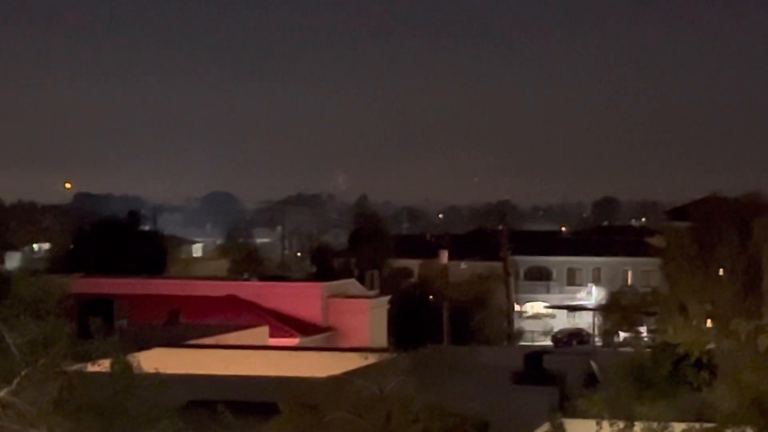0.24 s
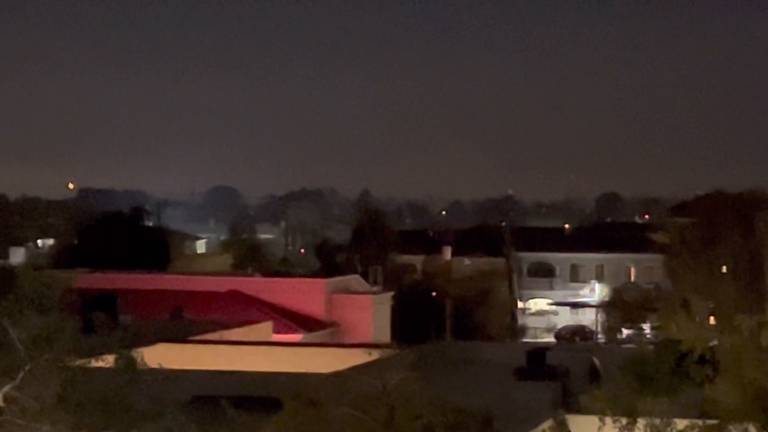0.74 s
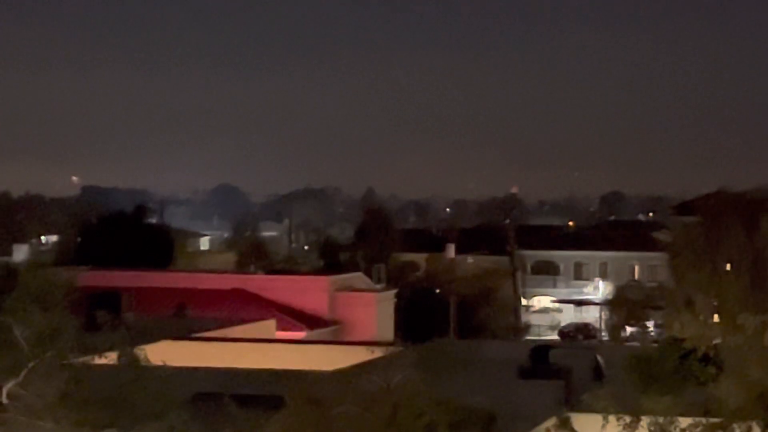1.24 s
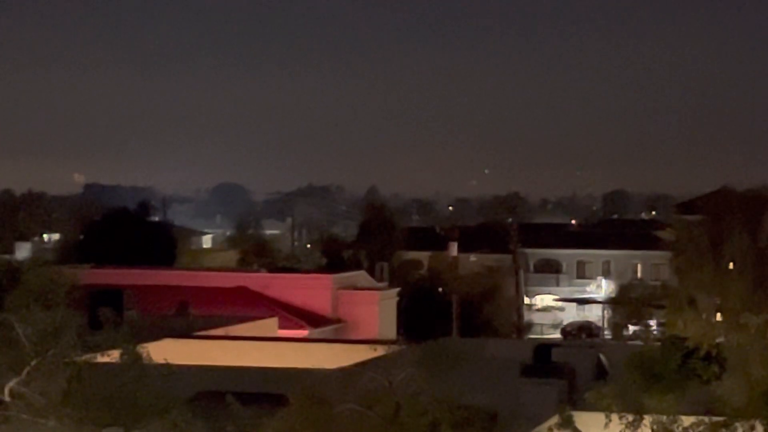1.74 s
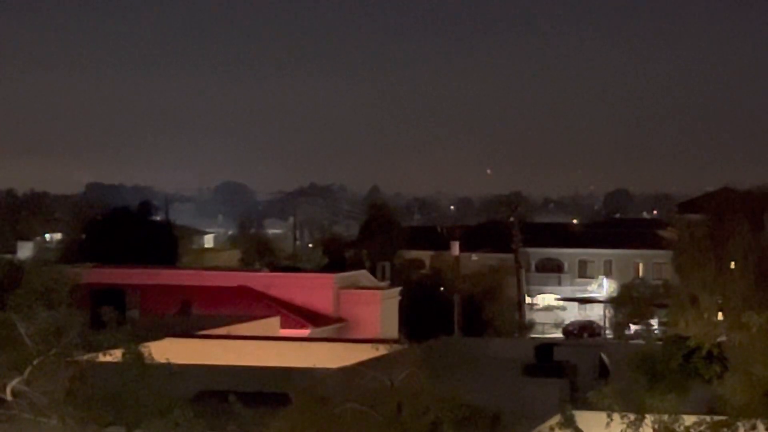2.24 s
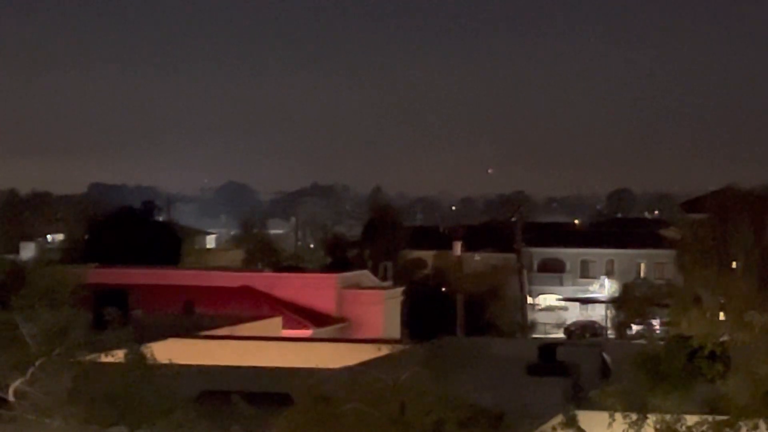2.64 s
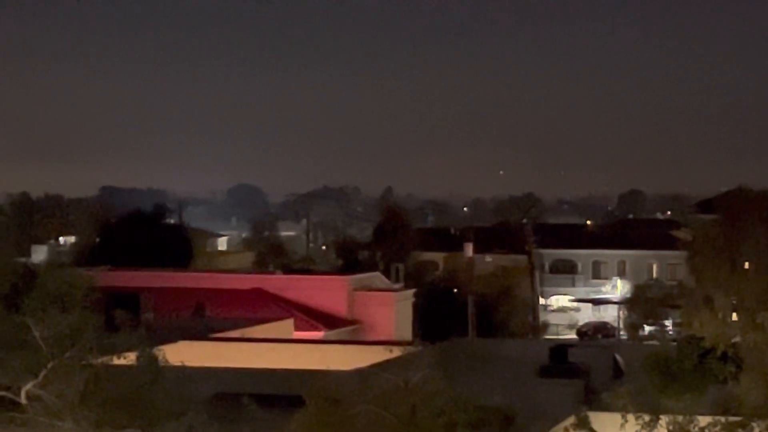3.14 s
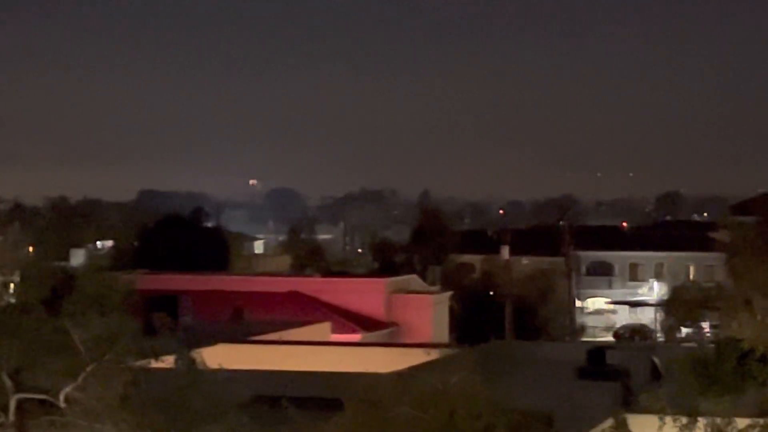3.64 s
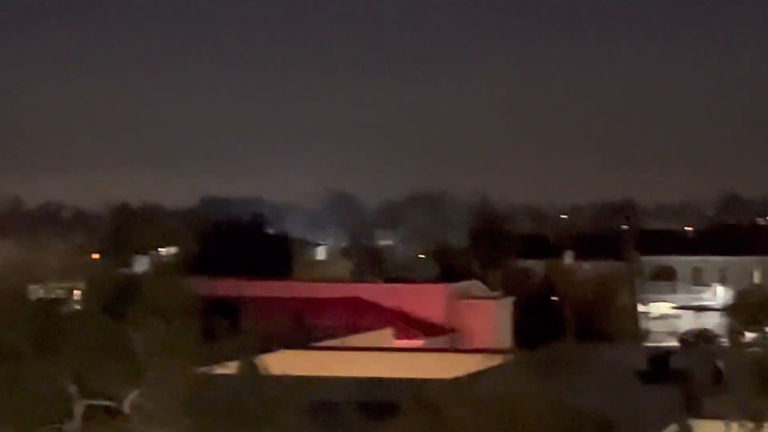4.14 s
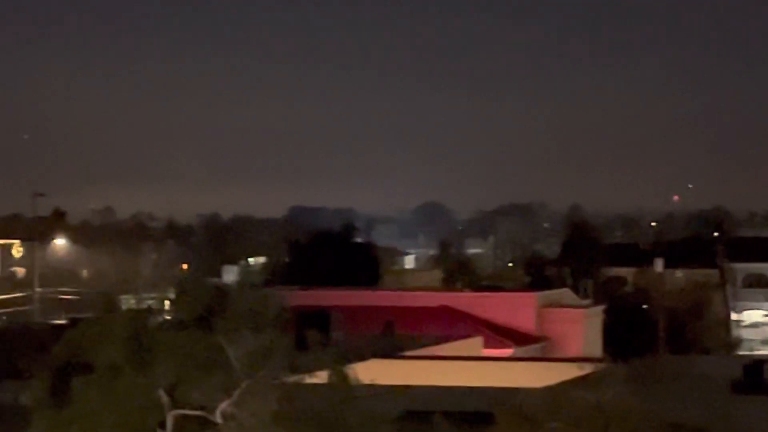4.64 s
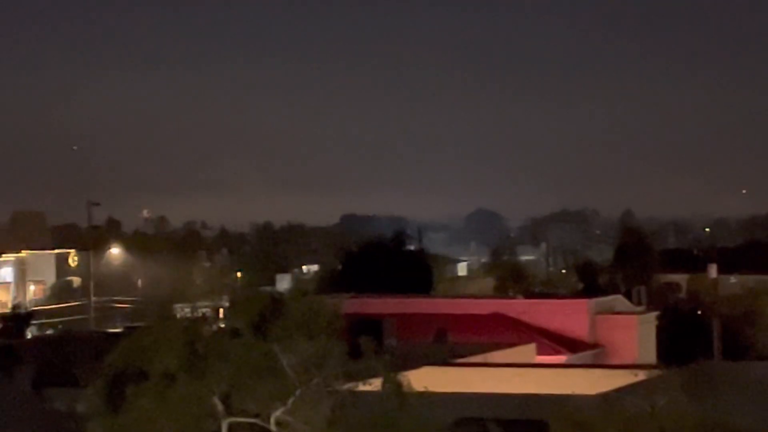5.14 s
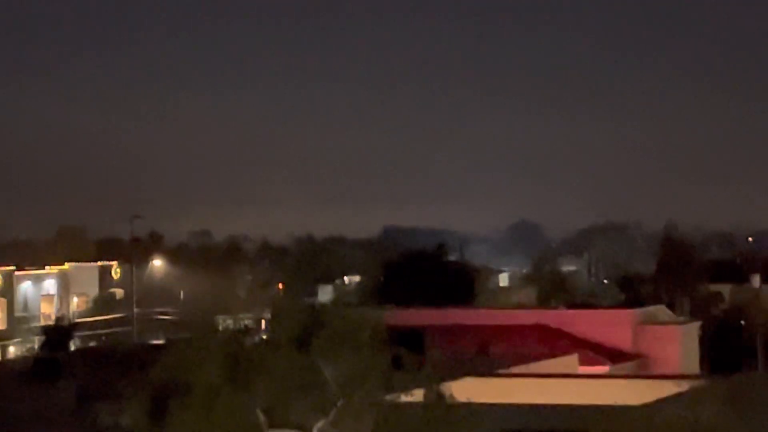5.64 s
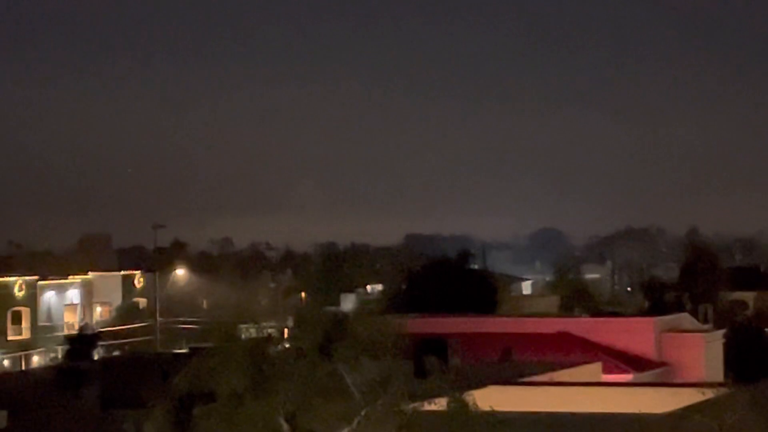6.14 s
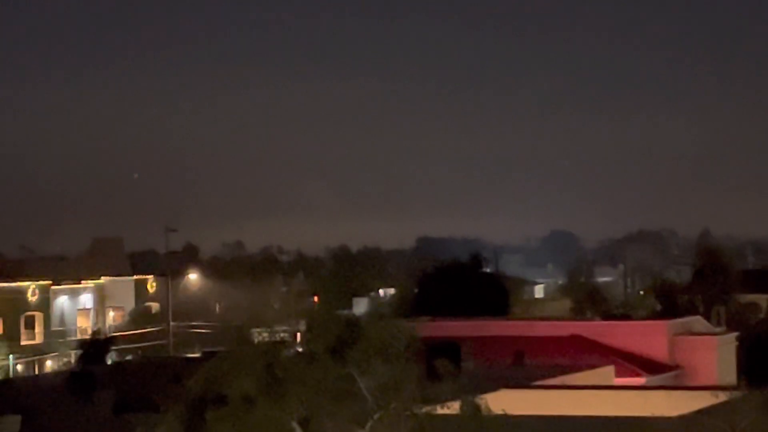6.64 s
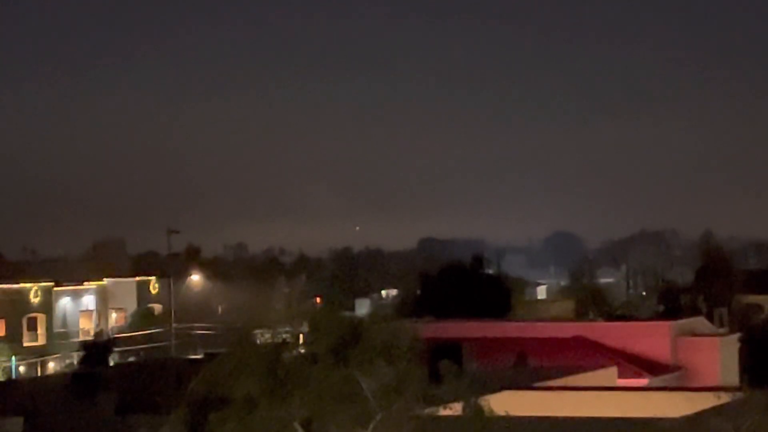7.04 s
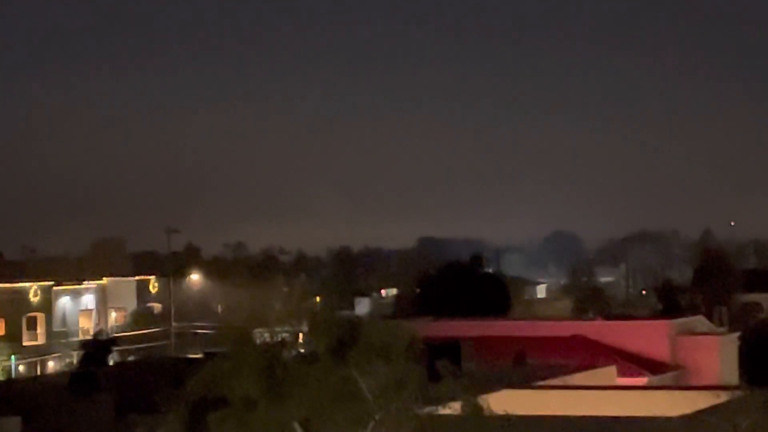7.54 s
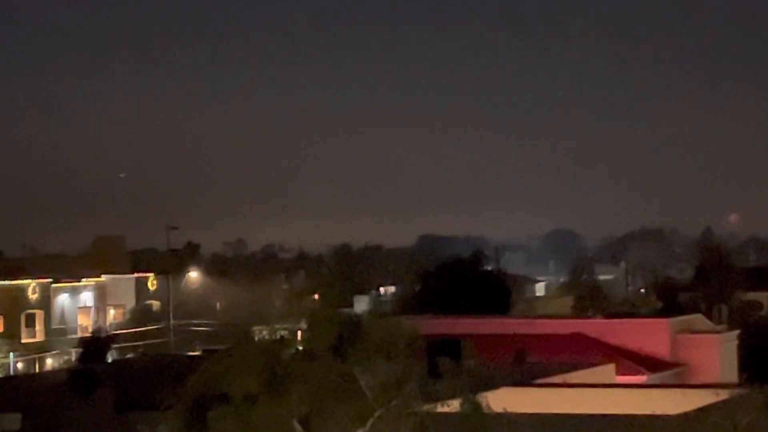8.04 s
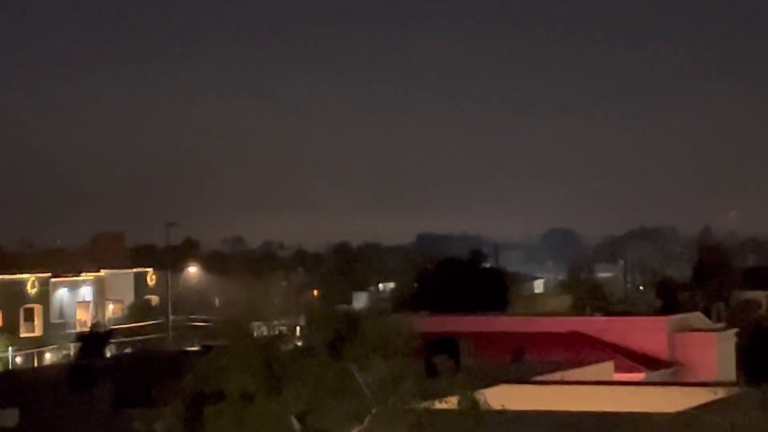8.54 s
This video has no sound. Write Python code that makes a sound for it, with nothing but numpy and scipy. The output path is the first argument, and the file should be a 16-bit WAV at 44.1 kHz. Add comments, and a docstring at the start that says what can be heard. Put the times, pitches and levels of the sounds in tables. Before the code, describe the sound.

Distant fireworks at night across a suburb, heard from a balcony on a phone with narrow, bass-softened stereo. From the start, faint hiss sits under a wavering low rumble of countless merged bursts and a hazy wash of brighter echoes. At 0.3-0.45 s dull knocks and booms appear; a firmer boom lands near 1.0 s, followed by rapid smaller pops until about 2 s. Between 2 and 4 s come spaced, deep muffled thuds, with sharper pops near 3.6 s. A tiny dry tick falls close by at 4.4 s, then hollow booms at 4.6 and 4.9 s. A crowded volley rattles at 6.1-6.3 s. At 7.1 s the loudest burst bangs hard, ringing hollow and slapping off walls. Weaker pops follow around 7.6-8.1 s; a last tight group knocks and cracks at 8.6-8.7 s as the rumble continues until the end.

```python
"""Night fireworks far off over a suburb, heard by a phone on a balcony about 9 s long.
From the start, town hiss lies under a rumble of countless merged far bursts and a bright haze of echoes.
From 0.3 s single bursts knock and boom: pulses dulled by air, thrown back by near walls and houses,
some with a hollow ring. A dry tick falls near the phone at 4.4 s, a volley crowds 6.1 s, the loudest
burst comes at 7.1 s, a last group at 8.6 s. The phone delays the bass and narrows much of the stereo."""
import sys
import numpy as np
from scipy import signal
from scipy.fft import rfft, irfft, next_fast_len
from scipy.io import wavfile
from scipy.ndimage import uniform_filter1d

SR = 44100
rng = np.random.default_rng(int(sys.argv[2]) if len(sys.argv) > 2 else 0)


def store_pcm(level_fs):
    """Save levels as 16-bit WAV."""
    pcm = np.round(np.clip(level_fs, -1, 1) * 32767).astype(np.int16)
    wavfile.write(sys.argv[1], SR, np.atleast_2d(pcm).T)


N = 387638
SPAN = 2 ** 14  # samples given to one burst with its echoes
SIDES = np.array([[1], [-1]])  # left, right


def undb(db):
    """Turn dB into an amplitude factor."""
    return 10 ** (np.asarray(db) / 20)


def level(x, db):
    """Scale to an RMS level in dB, taken over both channels together."""
    return x * undb(db) / np.sqrt(np.mean(x ** 2))


def on_log(hz, points_hz, values):
    """Straight lines on a log-frequency axis."""
    return np.interp(np.log(hz + 1), np.log(points_hz), values)


def colour(x, points):
    """Filter by a (f/Hz, gain/dB) outline without shifting phase."""
    size = next_fast_len(N)
    hz = np.fft.rfftfreq(size, 1 / SR)
    gain = undb(on_log(hz, *np.transpose(points)))
    return irfft(rfft(x, size) * gain, size)[..., :N]


def walk(rate):
    """Random levels, rate per second, slewed twice into a smooth wander with a spread near a third."""
    k = int(SR / rate)
    steps = np.repeat(rng.standard_normal(N // k + 1), k)
    return 0.46 * uniform_filter1d(uniform_filter1d(steps, k), k)[:N]


def hiss():
    """Town hiss and microphone noise: coloured noise whose level wavers slightly."""
    # outline of the hiss: f/Hz, relative level/dB
    hiss_outline = [(300, -34), (1000, -12.5), (2000, -0.5), (2700, -2), (3300, -8), (4500, -12.5),
                    (5600, -15.5), (7000, -23.5), (8500, -25), (10300, -30), (11500, -36)]
    noise = colour(rng.standard_normal((2, N)), hiss_outline)
    return level(noise, -65) * undb(0.47 * walk(5.3) + 0.38 * walk(1.4))


def rustle():
    """Narrow bands of noise in the haze: slow noise turned up to a drifting centre, its level swelling."""
    # drifting bright bands: centre f/Hz, width f/Hz, level/dB re haze before swelling, drift scale f/Hz
    drifting_bands = [(1720, 300, -4.5, 90), (2155, 360, -12, 120)]
    out = 0
    for hz, width, db, drift in drifting_bands:
        low_pass = signal.butter(2, width / 2, fs=SR, output="sos")
        slow = signal.sosfilt(low_pass, rng.standard_normal((2, 2, N)))
        turn = 2 * np.pi * np.cumsum(hz + drift * walk(1.5) * 2) / SR
        band = slow[0] * np.cos(turn) + slow[1] * np.sin(turn)
        out = out + level(band, db) * undb(4 * walk(6))
    return out


def rumble():
    """Faint bursts at random moments, smeared by their echoes, melt with noise into a wavering roar."""
    # roar of the merged far bursts, before the balcony: t/s, low level/dB, upper level/dB
    roar_levels = [(0.0, -39.5, -51), (0.46, -35.5, -55.5), (0.9, -39, -54), (1.1, -36.5, -54),
                   (1.35, -37, -49.5), (2.47, -37, -54), (3.871, -34, -51.5), (4.31, -38.5, -53),
                   (4.77, -36.5, -45.5), (5.02, -37.5, -51), (5.97, -37.5, -53), (6.31, -33, -50),
                   (6.76, -36, -51.5), (7.07, -32.5, -52.5), (7.27, -30.5, -45.5), (7.929, -37, -50.5),
                   (8.54, -33.5, -52.5), (8.79, -36, -39.5)]
    # outline of the roar before its parts are levelled: f/Hz, gain/dB
    roar_outline = [(15, -34), (25, -8), (69, -1.5), (155, 0), (245, -2), (294, -10), (345, -10.5),
                    (421, -12.5), (629, -20), (695, -20), (939, -27.5), (1970, -37), (3000, -62),
                    (3900, -76), (6600, -120)]
    # lingering bright echoes over the roofs, before the balcony: t/s, level/dB
    haze_levels = [(0.0, -63.5), (1.03, -62), (1.15, -58.5), (1.36, -57), (1.62, -59.5), (2.25, -63.5),
                   (3.11, -61), (3.67, -55.5), (4.04, -59.5), (4.55, -58), (5.09, -62.5), (6.02, -62),
                   (6.19, -59), (6.9, -63.5), (7.12, -59), (7.27, -56), (7.74, -60), (8.45, -61.5),
                   (8.67, -61.5), (8.79, -60.5)]
    far_per_s, directions = 90, 4  # far bursts per second from all directions together
    t = np.arange(N) / SR
    far = np.zeros((2, N))
    for _ in range(directions):
        moments = rng.random(N) < far_per_s / directions / SR
        hits = moments * undb(2.24 * rng.standard_normal(N))
        tail = rng.standard_normal((2, SPAN // 2)) * undb(-60 * t[:SPAN // 2] / 0.28)
        far += signal.fftconvolve(hits[None], tail, axes=1)[:, :N]
    steady = rng.standard_normal((2, N))
    roar = colour(level(far, -2.4) + level(steady, -3.0), roar_outline)
    low = signal.sosfiltfilt(signal.butter(2, 450, fs=SR, output="sos"), roar)
    top = signal.sosfiltfilt(signal.butter(2, 1200, "high", fs=SR, output="sos"), roar)
    upper = roar - low - top
    haze = (level(top, 0) + rustle()) * undb(np.interp(t, *np.transpose(haze_levels)))
    s, low_db, upper_db = np.transpose(roar_levels)
    low = level(low, 0) * undb(np.interp(t, s, low_db))
    upper = level(upper, 0) * undb(np.interp(t, s, upper_db))
    return low + upper + haze


def tick():
    """One dry tick close to the phone: bright noise dying in about half a millisecond, with a faint tail."""
    start_s, noise_db, tail_db = 4.3579, -46, -24  # noise level before its colour; tail re tick
    t = np.arange(N) / SR - start_s
    after = np.clip(t, 0, 1)
    shape = (t >= 0) * (np.exp(-after / .0005) + undb(tail_db) * np.exp(-after / .02))
    outline = [(1000, -30), (2500, 2), (6000, -2), (11000, -3)]  # f/Hz, gain/dB
    return undb(noise_db) * colour(rng.standard_normal(N) * shape, outline)


def rings():
    """Short damped tones with a soft start, a little uneven left and right."""
    # hollow rings of some bursts, as from a yard or street: t/s, nominal level/dB, f/Hz, decay t60/s
    hollow_rings = [(0.342, -27, 340, 0.053), (0.346, -26.5, 151, .12), (0.436, -24, 261, .08),
                    (0.976, -20, 381, 0.11), (0.98, -35, 840, .05), (1.133, -40.5, 1240, 0.079),
                    (1.135, -38, 694, 0.055), (1.297, -26.5, 314, .08), (1.311, -39.5, 1300, .07),
                    (1.541, -29, 904, .047), (1.551, -39.5, 1840, .07), (1.976, -42, 1035, .056),
                    (1.979, -26.5, 340, .07), (2.462, -38.5, 853, .045), (2.465, -21.5, 153, .12),
                    (2.986, -23.5, 140, 0.13), (3.322, -26, 402, 0.11), (3.616, -31.5, 967, .045),
                    (3.622, -36, 1570, .04), (3.735, -29.5, 276, 0.078), (3.747, -40, 1730, .08),
                    (4.555, -30, 319, 0.065), (4.555, -33, 867, 0.062), (4.579, -41, 1600, .05),
                    (4.637, -26.5, 267, .08), (4.931, -21.5, 215, .09), (5.367, -36, 900, .054),
                    (6.098, -19, 311, 0.079), (6.1, -35.5, 770, .05), (6.115, -20, 311, .09),
                    (6.129, -21, 312.4, .09), (6.153, -33.5, 702, .05), (6.236, -33, 324, .05),
                    (7.113, -13, 920, .048), (7.115, -11, 600, .06), (7.116, -6, 201, .1),
                    (7.122, -25.5, 1655, 0.046), (7.122, -28, 2244, 0.032), (7.134, -32, 1665, 0.061),
                    (7.632, -41, 1530, .05), (8.623, -26.5, 279, 0.077), (8.703, -25, 976, 0.056),
                    (8.704, -19, 433, 0.087), (8.713, -21.5, 404, .074), (8.713, -37, 920, .05)]
    share_db, rise_s = -4.5, 0.0027  # added to every nominal level; time constant of the start
    t = np.arange(SPAN // 2) / SR
    out = np.zeros((2, N + SPAN))
    for s, nominal_db, hz, t60 in hollow_rings:
        phase, pan_db = rng.standard_normal(2)
        tone = np.sin(2 * np.pi * hz * t + phase)
        shape = (1 - np.exp(-t / rise_s)) * undb(-60 * t / t60)
        i = int(s * SR)
        out[:, i:i + len(t)] += undb(nominal_db + share_db + pan_db * SIDES) * shape * tone
    return out[:, :N]


def walls(hz):
    """Spectrum of the near slaps on each side: later ones duller, rough fronts scatter the treble."""
    # slaps from the balcony and the next walls, before random spread: delay t/ms, level/dB, left-right/dB
    wall_slaps = [(3.94, -13, -5), (9.34, -3, -2), (13.74, -5, -1.5), (18.15, -9, -3), (24.88, -14, 0.5),
                  (29.69, -9, 3), (39.6, -19, -4), (56.42, -10.5, -2)]
    dull_hz_ms = 60000  # a slap after 10 ms dulls from a tenth of this in Hz
    slaps = 0
    for ms, db, pan_db in wall_slaps:
        level_chance, delay_chance, side_chance = rng.standard_normal(3)
        gain = undb(db + 1.5 * level_chance + pan_db / 2 * SIDES)
        delay_ms = ms + 0.6 * delay_chance + 0.02 * side_chance * SIDES
        dulling = 1 / np.sqrt(1 + (hz * ms / dull_hz_ms) ** 4)
        slaps = slaps + gain * dulling * np.exp(-2j * np.pi * hz * delay_ms / 1000)
    t = np.arange(SPAN // 4) / SR
    decay = undb(-10 - 60 * t / 0.078)  # t60 0.078 s
    scatter = rng.standard_normal((2, SPAN // 4)) * decay * (1 - np.exp(-(t / 0.0064) ** 4))
    lumps = np.repeat(undb(3.9 * rng.standard_normal((2, SPAN // 512))), 128, axis=1)
    treble_only = 1 / np.sqrt(1 + (1180.0 / (hz + 1)) ** 6)
    return slaps + rfft(scatter * lumps, SPAN)[:, :len(hz)] * treble_only


def houses(hz, shares):
    """Spectrum of the echoes from rows of houses on each side: patchy noise, each band with its own decay."""
    # echoes in the five bands from thump to crack: decay t60/s, relative level/dB
    house_echoes = [(0.29, 12), (0.36, 8.5), (0.12, -7.5), (0.97, -8), (0.23, -4)]
    t = np.arange(SPAN) / SR
    patches = np.repeat(undb(2.8 * rng.standard_normal((2, SPAN // 256))), 256, axis=1)
    scatter = rng.standard_normal((2, SPAN)) * patches * (1 - np.exp(-t / 0.0013)) * 0.04
    out = 0
    for share, (t60, db) in zip(shares, house_echoes):
        out = out + share * rfft(scatter * undb(db - 60 * t / t60))[:, :len(hz)]
    return out


def bursts():
    """Each burst is a pulse shaped in five bands and dulled by the air, with wall slaps and house echoes."""
    # single bursts, before air and balcony: t/s, knock level/dB, boom/dB re knock, snap/dB re knock,
    # crack/dB re knock, echoes/dB re the usual share, distance/km
    single_bursts = [(0.343, -30, 9, -29, -31, -3.5, 1.5), (0.439, -30, 6.5, -14.5, -23, 1.5, 2),
                     (0.45, -33, 3.5, -10.5, -32, 3, 3.5), (0.909, -42.5, 16.5, -6, -25, 2, 2),
                     (0.977, -26.5, 6.5, -13, -25, 1, 0.99), (1.112, -38.5, -7, 1, -8, -2, 1.5),
                     (1.133, -36.5, 2.5, 3.5, -6, -2, 1.5), (1.18, -38, 11.5, -6.5, -16, -1, 2),
                     (1.252, -42, 5, 7, -11, 8, 2.5), (1.268, -39, 1, 4, -3.5, -0.5, 2),
                     (1.297, -32, 6, -6, -27, 2, 3), (1.313, -37, 7, 5, 0, -4, 2),
                     (1.367, -45, 5.5, 3.5, -9, 5.5, 2), (1.543, -30.5, -3, 5, -2, -2, 0.24),
                     (1.592, -42.5, 19, -5.5, -17, -3.5, 3.5), (1.63, -40.5, -2, 2, -22, -1.5, 2.9),
                     (1.676, -45.5, -7.5, 10.5, -19, 0.5, 3), (1.83, -37.5, 16, -9, -19, -0.5, 3),
                     (1.867, -38, 16.5, -4.5, -24, -7, 3), (1.978, -28.5, 3, -6, -9, -2, 2.8),
                     (2.259, -43.5, 21, -9.5, -25, -2, 3.1), (2.462, -36.5, 16.5, -1, -10, 2, 2),
                     (2.55, -48, 25, -15.5, -9, -0.5, 1), (2.652, -41, 14, -13, -26, 1, 3),
                     (2.714, -36.5, 15, -11.5, -22, -1.5, 3.3), (2.983, -43.5, 27.5, -16, -28, -7.5, 3.5),
                     (3.314, -30.5, -13, -32.5, -32, 10, 1), (3.617, -32, 18.5, -8, -9, -1, 2),
                     (3.737, -32.5, 1.5, 1, -6, -2, 0.8), (4.05, -38.5, 18.5, -9, -19, 0, 0.82),
                     (4.127, -43, 24, -15, -13, -5.5, 1), (4.202, -35, 13.5, -3.5, -12, -1.5, 1.6),
                     (4.288, -39, 9, -26, -19, 2.5, 1), (4.555, -32, -1.5, -6, -9.5, 7, 1.1),
                     (4.636, -32.5, 6, -6.5, -33, 6, 2), (4.685, -38, 13, -19, -20, 7, 2),
                     (4.731, -32, 6, -10, -23.5, 2, 3.7), (4.929, -27.5, 9.5, -10.5, -20, -0.5, 1.7),
                     (5.275, -47.5, 16, -21.5, -28, 8, 1.2), (5.349, -38, 15, -30, -29, 5, 1),
                     (5.368, -40.5, 19.5, 5.5, -6, 4.5, 2.1), (5.467, -44, 17, -3, -3, 5, 2.6),
                     (5.58, -33, -2, -13, -12, 2, 1.6), (5.953, -38, 17, -23, -24.5, -2.5, 1.4),
                     (6.091, -32, -3, -12, -11, -5, 2), (6.1, -24.5, 1.5, -10.5, -8, -1.5, 1.6),
                     (6.11, -29.5, 2.5, -3.5, -14.5, -0.5, 2.5),
                     (6.121, -28.5, -7.5, -16.5, -15.5, -1, 1.8), (6.133, -32, 7, -19, -23.5, -2, 2),
                     (6.144, -34, 12, -19, -18, -15, 2), (6.155, -30, 9.5, 2.5, -12, -2, 1.8),
                     (6.201, -36.5, -2, -3, -24, 3, 3), (6.24, -34, 0.5, -3.5, -26, 8, 3.9),
                     (6.28, -36.5, 3, -7.5, -20.5, 9, 3), (6.32, -37.5, -4, -7.5, -27, 6, 2.3),
                     (6.502, -40.5, 14, -7, -21, 7, 2.7), (6.689, -40.5, 16.5, -10.5, -11, -8.5, 2.5),
                     (6.767, -40, 8.5, 4.5, -8, 5, 3.5), (7.1142, -9.5, 0.5, -1.5, -3.5, -2.5, 0.92),
                     (7.168, -30.5, 3, -9.5, -22.5, -5.5, 3), (7.249, -27.5, -1, -22.5, -32.5, 3.5, 2.1),
                     (7.39, -31.5, 4, -14, -23, -10, 1.8), (7.633, -29.5, -9.5, 2.5, -5, -1, 0.3),
                     (7.715, -38.5, 0, 0.5, -17, 4, 1.5), (7.776, -43, 16.5, -17, -30, -1.5, 3.9),
                     (7.805, -43.5, 17.5, -8, -26, 1.5, 3), (7.896, -41.5, 10, 3, 3.5, -1, 1),
                     (8.123, -33, 3, -14, -12, 2.5, 2.5), (8.623, -28, -5.5, -3.5, -8.5, -2, 0.8),
                     (8.646, -40, 6, -4, 8, -8.5, 1.2), (8.682, -27, -17.5, -10.5, -12, 0, 2.5),
                     (8.704, -21.5, -30, -3, -9.5, 1, 1.3)]
    # thump, body (the boom), knock, snap, crack: low edge f/Hz, high edge f/Hz
    band_edges = [(40, 120), (120, 280), (280, 500), (500, 1000), (1000, 2400)]
    thump_db, thump_per_boom = -11, 0.77  # the deepest band follows the boom
    slap_db, house_db = -5.5, -8  # usual shares of wall slaps and house echoes
    air_hz, air_slope = 1880, .22  # the air dulls from here at 1 km, from lower down farther off
    ripple_db, smear_rad = 3, 0.35  # spread of treble dents and phase at 1 km, from ground and unsettled air
    ripple_hz = np.arange(400, 4500, 170)
    hz = np.arange(4500 * SPAN // SR) * SR / SPAN  # no burst reaches above 4500 Hz
    lo, hi = np.transpose(band_edges)
    centre = np.sqrt(lo * hi)
    shares = [on_log(hz, centre, row) for row in np.eye(len(centre))]
    echo_dull = 1 / np.sqrt(1 + (hz / 2080) ** 8)  # walls and houses return the treble duller
    small = 1 / np.sqrt(1 + (73.5 / (hz + 1)) ** 6)  # small shells make little deep bass
    # the parapet shades the treble of the direct pulse, not of the echoes
    shade = undb(-3.5 / (1 + (1200 / (hz + 1)) ** 4))
    lead, fade = 2 ** 9, signal.windows.tukey(SPAN, 1 / 20)  # samples of room before the pulse; soft ends
    out = np.zeros((2, N + SPAN))
    for s, knock, boom, snap, crack, echo_db, km in single_bursts:
        bands = np.array([thump_db + thump_per_boom * boom, boom, 0, snap, crack])
        # a pulse's peak in a band grows with the band's width
        band_db = knock + bands - 20 * np.log10(2 * (hi - lo) / SR)
        pulse = undb(on_log(hz, centre, band_db))

        top_hz = air_hz / km ** air_slope
        air = small / np.sqrt(1 + (hz / top_hz) ** 8 + (hz / top_hz / 1.35) ** 30)
        dents_db = ripple_db * np.sqrt(km) * rng.standard_normal(len(ripple_hz))
        smear = smear_rad * km ** 2 * rng.standard_normal(len(ripple_hz))
        air = air * undb(np.interp(hz, ripple_hz, dents_db, left=0))
        air = air * np.exp(1j * np.interp(hz, ripple_hz, smear, left=0))

        lag_s = rng.standard_normal() * .0001 * SIDES / 2  # direction of arrival
        direct = shade * np.exp(-2j * np.pi * hz * lag_s)
        echoes = undb(slap_db) * walls(hz) + undb(house_db) * houses(hz, shares)
        paths = direct + undb(echo_db) * echo_dull * echoes
        i = int(s * SR)
        out[:, i:i + SPAN] += fade * np.roll(irfft(pulse * air * paths, SPAN), lead, axis=1)
    return out[:, lead:lead + N]


def balcony(x):
    """The balcony and phone ring in resonances, and the floor mirrors the sound a few milliseconds later."""
    # resonances (a negative boost is a dip): f/Hz, width f/Hz, boost/dB
    resonances = [(61, 7, 8), (84, 23, -10), (96.5, 11, 6.5), (147.1, 6.5, 7), (183, 15, 1),
                  (342, 8.5, 6.5), (576, 10, 2.5), (692, 7.3, 7), (850, 17, 3.5), (1070, 11, 0.5),
                  (1340, 500, 1.5), (1638, 64, 2.5), (1946, 45, 3), (2200, 5.7, 5.5), (2450, 23, 1.5),
                  (5530, 13, 13.5), (8100, 150, 3.5), (9450, 190, 3)]
    floor_ms, floor_db, floor_pan_db = 3.076, -18.5, -0.4  # pan is left minus right
    size = next_fast_len(N + SPAN)
    hz = np.fft.rfftfreq(size, 1 / SR)
    gain = 1
    for ring_hz, width, db in resonances:
        gain = gain * (1 + (undb(db) - 1) / (1 + 2j * (hz - ring_hz) / width))  # rings after the sound
    floor = undb(floor_db + floor_pan_db / 2 * SIDES) / (1 + (hz / 3000) ** 4)
    floor = floor * np.exp(-2j * np.pi * hz * floor_ms / 1000)
    return irfft(rfft(x, size) * gain * (1 + floor), size)[:, :N]


def scene():
    """Far sounds pass the balcony; the tick beside the phone stays dry."""
    return balcony(hiss() + rumble() + rings() + bursts()) + tick()


def record(dry):
    """Close phone ports share the bass; processing turns the phase and delays low notes; steep top cut."""
    # phone ports: f/Hz, left-right difference kept level/dB, left minus right level/dB
    phone_ports = [(30, -19, 4), (90, -21, -4), (208, -12.5, -2.5), (266, -14.5, -6.5), (400, -4, 0.5),
                   (830, -5, -1), (1020, -5.5, -1.5), (1370, 1.5, -2), (1690, -8, -3.5), (2070, -14, -4),
                   (2830, -14, -0.5), (3600, -28.5, 1), (5000, -39, -1), (7400, -4, 0.5), (8500, -23.5, 0),
                   (9800, -21.5, 0), (11000, 2.5, 2.5), (11700, -15, 1)]
    # phase of the left channel behind the right: f/Hz, lag/turns
    port_turns = [(400, 0), (700, .25), (1050, .05), (1500, .25), (2000, .2), (2500, 0), (5200, 0),
                  (5800, .27), (6900, .5), (8300, 1), (9800, 1), (11800, 1.5)]
    late_ms, late_hz = 12., 201  # delay of the deepest bass, and where it has halved
    size = next_fast_len(N + SPAN)
    hz = np.fft.rfftfreq(size, 1 / SR)
    to_end_s = np.arange(N)[::-1] / SR
    fade = np.sin(np.pi / 2 * np.clip(to_end_s / .008, 0, 1)) ** 2  # 8 ms fade at the end
    left, right = rfft(dry * fade, size)
    port_hz, kept_db, pan_db = np.transpose(phone_ports)
    kept = undb(on_log(hz, port_hz, kept_db))
    share = np.sqrt(2 + 2 * kept ** 2)  # holds the power of unrelated channels
    mid, side = (left + right) / share, kept * (left - right) / share
    tilt = undb(on_log(hz, port_hz, pan_db) / 2)
    tilt = tilt * np.exp(-1j * np.pi * on_log(hz, *np.transpose(port_turns)))
    late = np.exp(-2j * np.pi * late_ms / 1000 * late_hz * np.arctan(hz / late_hz))
    both = irfft(np.array([(mid + side) * tilt, (mid - side) / tilt]) * late, size)[:, :N]
    # small microphones lose the deepest bass
    both = signal.sosfilt(signal.butter(3, 45, "high", fs=SR, output="sos"), both)
    both = 1.6 * np.tanh(both * fade / 1.6)  # the loudest peak is rounded
    return signal.sosfilt(signal.ellip(8, .2, 70, 11700, fs=SR, output="sos"), both)


dry = scene()
out = record(dry)
store_pcm(out)
```